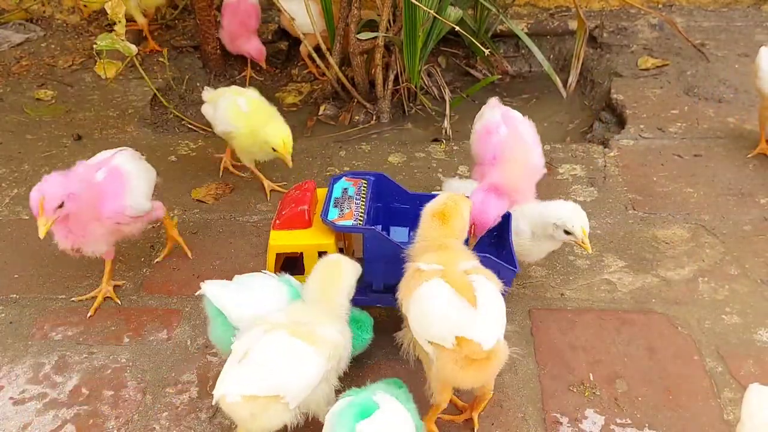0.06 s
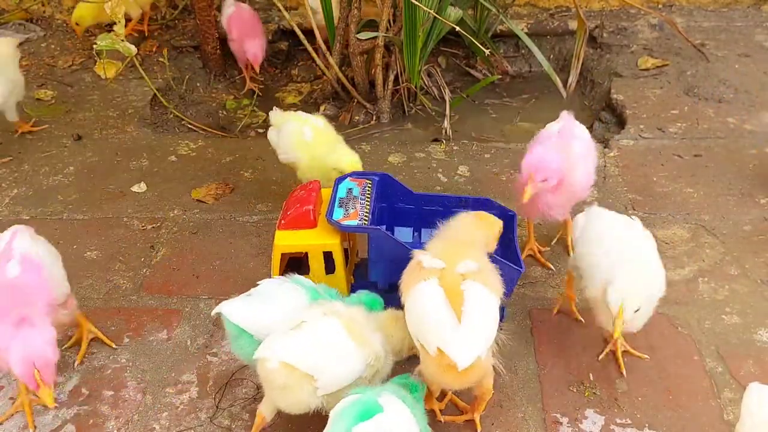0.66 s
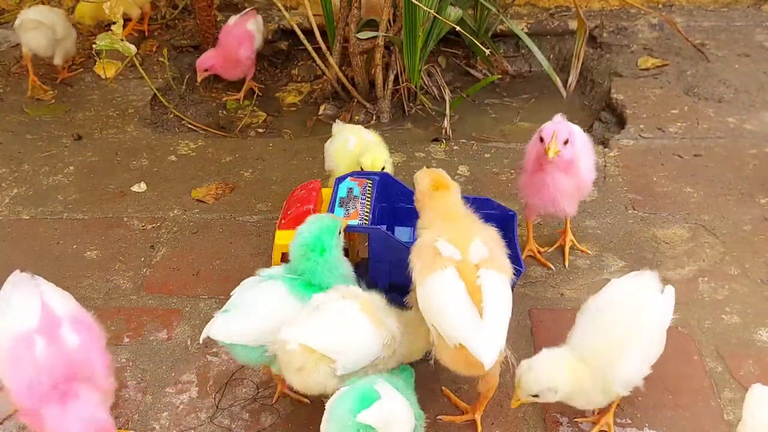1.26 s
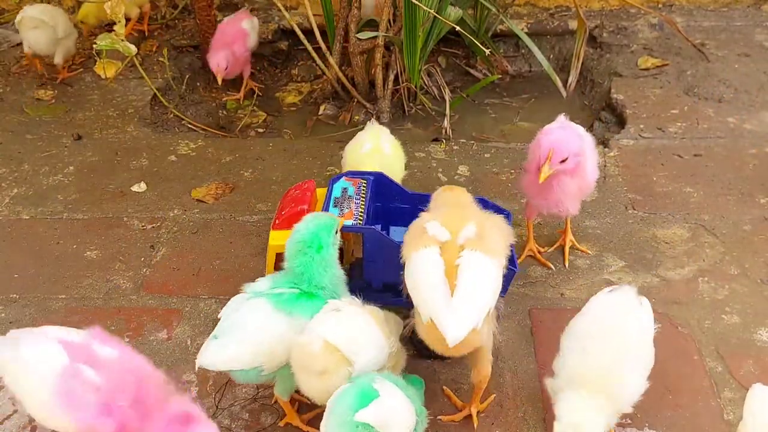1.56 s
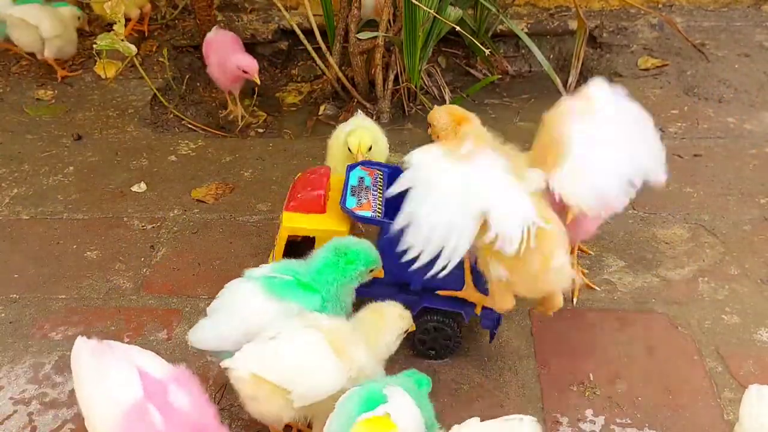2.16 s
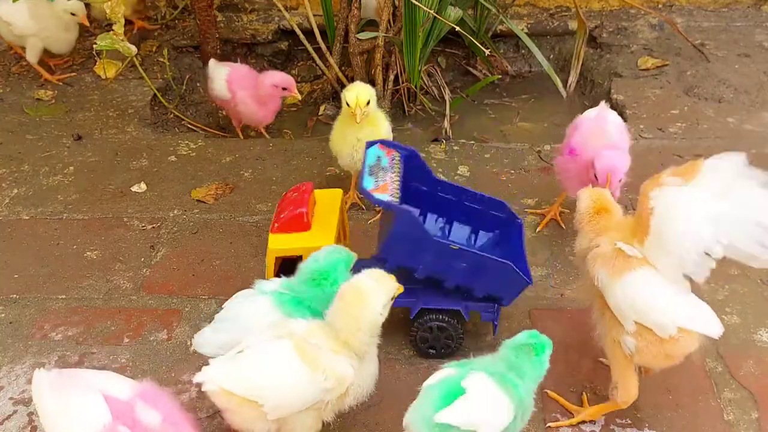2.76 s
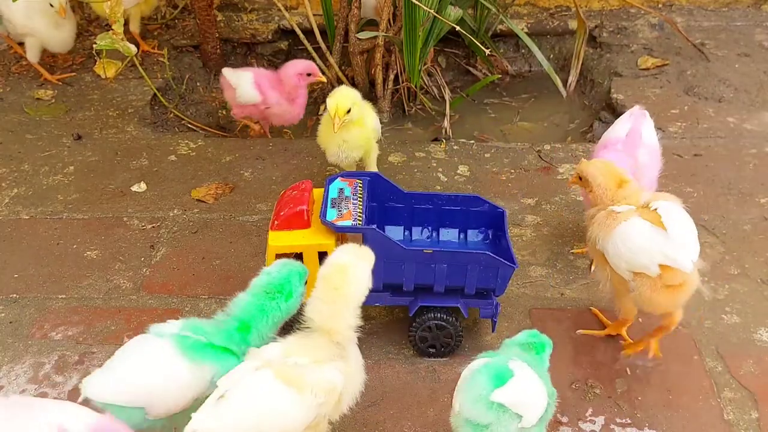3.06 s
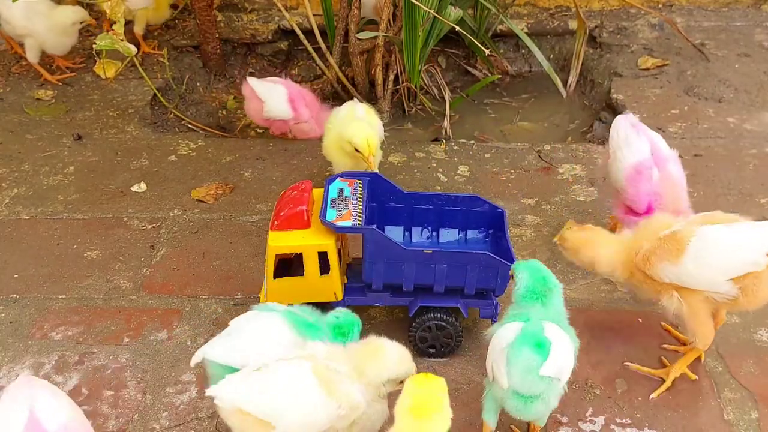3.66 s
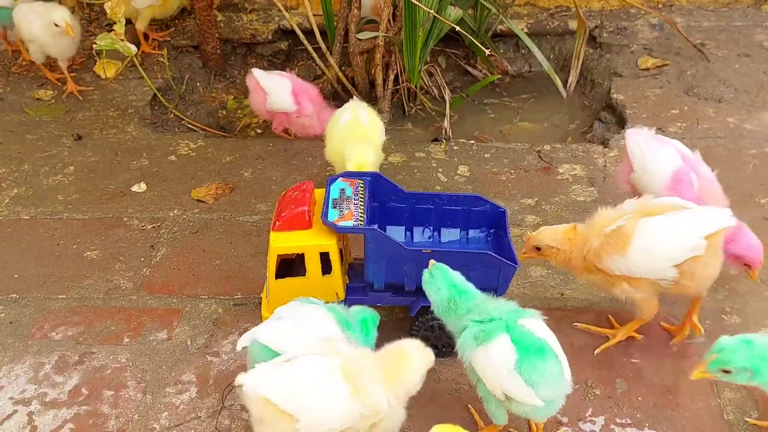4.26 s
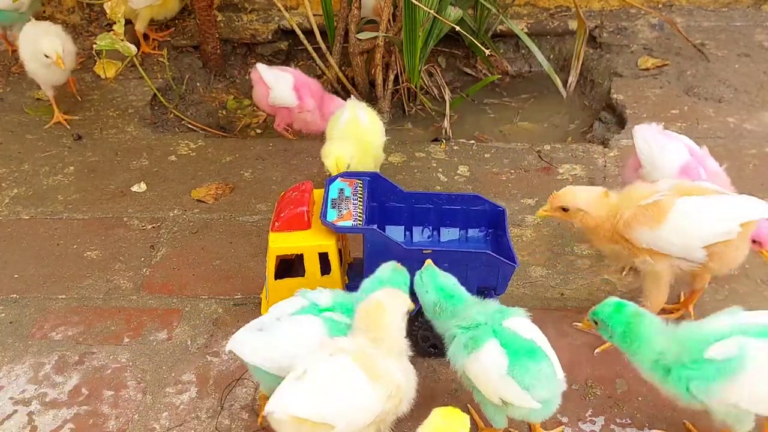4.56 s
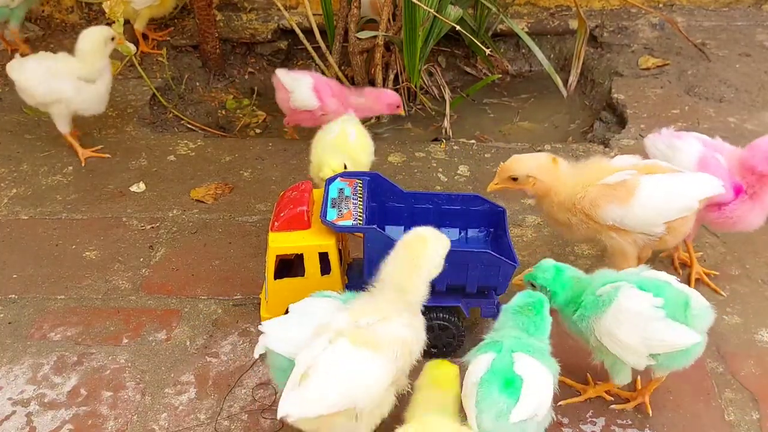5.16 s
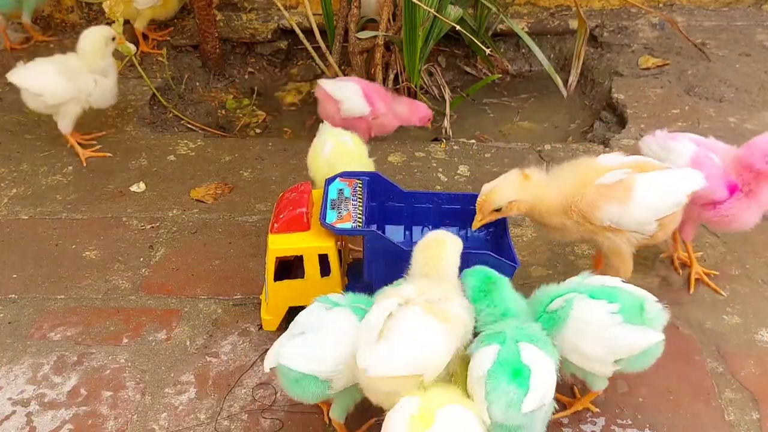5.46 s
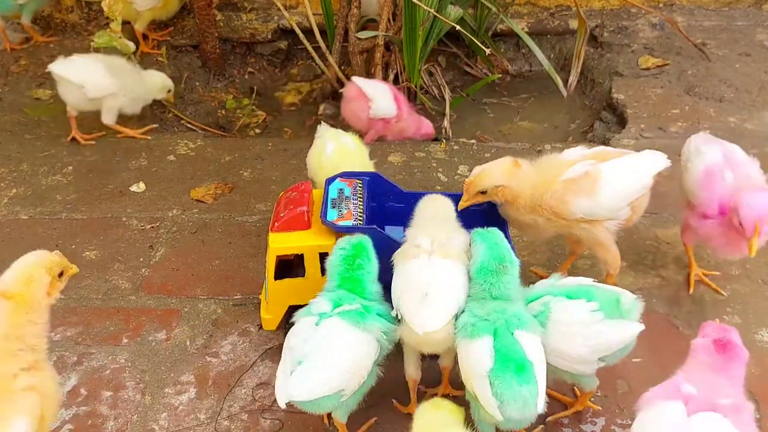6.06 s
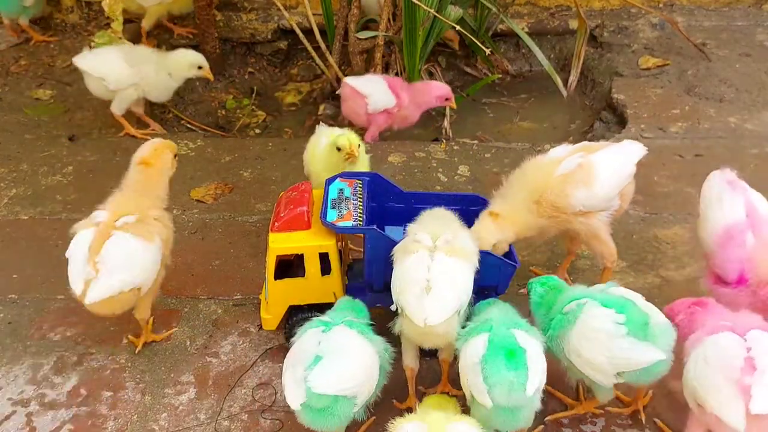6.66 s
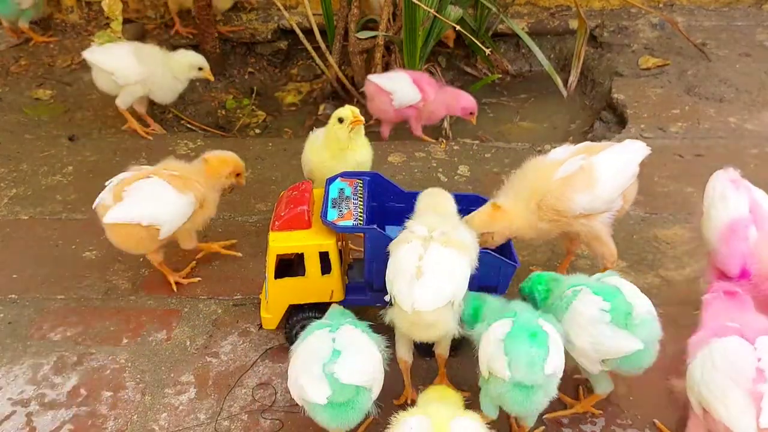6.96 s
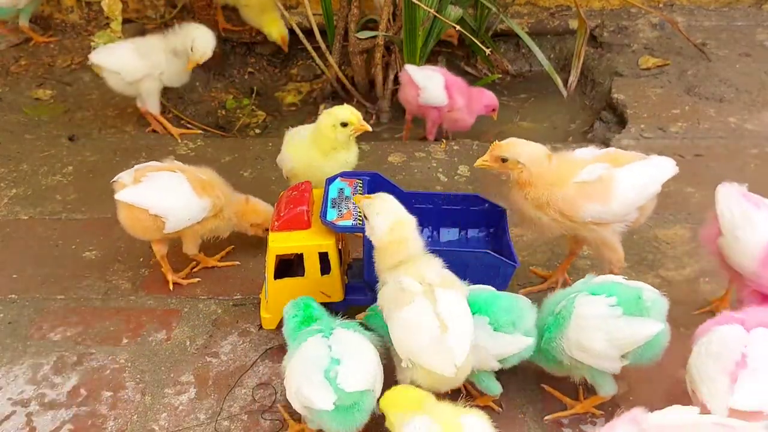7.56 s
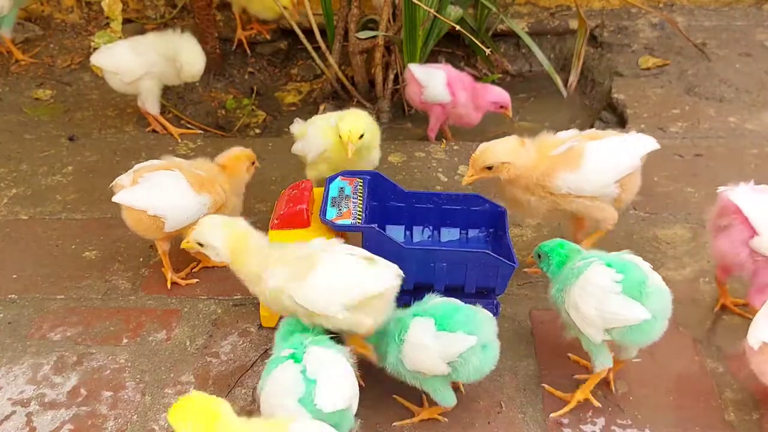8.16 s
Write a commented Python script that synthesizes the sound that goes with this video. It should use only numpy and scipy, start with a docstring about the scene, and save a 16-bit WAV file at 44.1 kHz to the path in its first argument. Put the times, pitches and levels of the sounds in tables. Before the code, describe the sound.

A flock of young chicks peeps close by in a brick yard, over a low rumble of moving air and a faint hum. Their beaks tap a hollow plastic toy truck. One chick trills and flaps in soft puffs of air, the toy's wheels scrape briefly, and a second trill comes with loud knocks. The hum swells and sinks while peeps and lighter pecks continue.

```python
"""From the start, chicks peep in a brick yard over moving air and a low hum; low walls give a short echo.
Soon their beaks peck a hollow plastic toy truck. Near 1.8 s one chick trills and flaps onto the toy,
pushing out puffs of air. The wheels grate as it tips at 2.4 s, and a second trill comes with loud knocks.
The hum swells around 5 s and sinks back, while peeps and lighter pecks go on to the end."""
import sys
import numpy as np
from scipy import signal
from scipy.fft import rfft, irfft, next_fast_len
from scipy.io import wavfile

SR = 44100
rng = np.random.default_rng(int(sys.argv[2]) if len(sys.argv) > 2 else 0)


def file_out(sig):
    """Save sig as 16-bit WAV at sys.argv[1]."""
    # one column per channel
    cols = np.atleast_2d(sig).T
    # limit, then scale
    lim = np.clip(cols, -1, 1)
    pcm = np.round(lim * 32767).astype(np.int16)
    wavfile.write(sys.argv[1], SR, pcm)


N = 370881
TIME = np.arange(N) / SR
JITTER = .009  # a voice shakes by this share of its pitch

# Peeps that slide down. Each row: start in seconds, length in seconds, middle pitch in Hz,
# level in dB, head start on the left in ms.
PEEPS = [(0.005, 0.031, 3060, -51, 0.1), (0.063, 0.038, 3660, -46, 0.074),
         (0.294, 0.036, 3300, -46, -0.092), (0.507, 0.071, 3640, -43.5, 0.2),
         (0.647, 0.045, 3500, -49, 0.01), (0.671, 0.06, 4130, -46.5, 0.17),
         (0.754, 0.027, 3320, -41, -0.071), (0.787, 0.055, 3660, -44.5, -0.042),
         (0.877, 0.07, 3110, -43, -0.23), (0.937, 0.045, 4100, -42.5, 0.037),
         (1.025, 0.044, 3640, -42.5, -0.069), (1.925, 0.035, 4000, -41, 0.014),
         (2.062, 0.041, 4190, -36.5, -0.0041), (2.18, 0.032, 3310, -44, -0.24),
         (2.318, 0.034, 3500, -49.5, 0.072), (2.508, 0.036, 3406, -38, -0.0029),
         (2.687, 0.049, 3200, -46, 0.039), (2.758, 0.045, 3130, -39.5, 0.065),
         (3.2, 0.024, 3290, -54, 0.24), (3.327, 0.031, 3690, -47, -0.018),
         (3.318, 0.05, 3180, -38.5, 0.091), (3.486, 0.051, 3555, -42.5, -0.35),
         (3.592, 0.028, 3300, -44.5, -0.043), (3.671, 0.03, 3090, -48.5, -0.049),
         (3.765, .026, 3030, -52, 0.043), (3.798, 0.033, 3470, -43.5, -0.053),
         (4.016, 0.055, 3590, -43, -0.085), (4.157, 0.049, 3940, -43, -0.01),
         (4.214, 0.031, 3110, -46, 0.053), (4.336, 0.02, 3285, -36, 0.023),
         (4.462, 0.049, 3690, -40, 0.011), (5.053, 0.06, 3430, -49.5, -0.049),
         (5.314, 0.057, 2760, -39.5, 0.19), (5.706, 0.03, 3190, -50.5, 0.054),
         (6.134, 0.063, 3600, -44.5, 0.15), (6.319, 0.038, 3330, -54, 0.03),
         (6.352, 0.037, 3960, -49, -0.084), (6.431, 0.027, 2900, -38.5, 0.17),
         (6.467, 0.056, 3190, -46, -0.0047), (6.689, 0.053, 3870, -48, 0.067),
         (6.796, 0.036, 2890, -44.5, 0.12), (7.061, 0.047, 2980, -40, 0.16),
         (7.295, 0.057, 3050, -54.5, 0.11), (7.917, 0.037, 3010, -44.5, -0.085),
         (8.103, 0.047, 3750, -43, -0.06), (8.186, 0.04, 3010, -46.5, 0.094),
         (8.276, 0.041, 3570, -45.5, -0.049), (8.37, 0.036, 2950, -50, 0.075)]
# How the toy's hollow shell and its panels ring. Each row: pitch in Hz, width in Hz, boost in dB.
SHELL = [(405, 140, 1.5), (700, 245, 1.5), (1152, 260, 3), (1608, 250, -1.5)]
PANELS = [(3020, 160, 12), (3670, 870, 8), (5040, 600, 2.5), (7080, 250, -7), (12000, 6800, -7)]


def amp(db):
    return 10 ** (np.asarray(db) / 20)


def unit(x):
    """Scales a signal to an average (rms) strength of one."""
    return x / np.sqrt(np.mean(x ** 2) + 1e-20)


def read(points, hz):
    """Looks up a value between a table's frequencies, on a logarithmic scale."""
    f, value = np.transpose(points)
    return np.interp(np.log(hz + 1), np.log(f + 1), value)


def add(mix, s, sound):
    """Mixes a stereo sound in at s seconds."""
    part = mix[:, max(round(s * SR), 0):][:, :sound.shape[1]]
    part += sound[:, :part.shape[1]]


def wander(size, hz):
    """A random wobble that changes up to about hz times a second."""
    padded = size + SR // 4
    f = np.fft.rfftfreq(padded, 1 / SR)
    return unit(irfft(rfft(rng.standard_normal(padded)) / (1 + (f / hz) ** 4)))[:size]


def noise(colour, alike):
    """Stereo noise shaped by a colour table; alike=1 makes both sides the same."""
    a, b = rng.standard_normal((2, N))
    pair = np.array([a, alike * a + np.sqrt(1 - alike ** 2) * b])
    size = next_fast_len(N)
    gain = amp(read(colour, np.fft.rfftfreq(size, 1 / SR)))
    return unit(irfft(rfft(pair, size) * gain, size)[:, :N])


def ring(x, modes):
    """Lets a sound ring at each of an object's own pitches."""
    return sum(amp(db) * signal.lfilter(*signal.iirpeak(hz, hz / width, SR), x)
               for hz, width, db in modes)


def place(x, pan_db, lead_ms):
    """Positive values make the left side louder and earlier; the top treble gets no head start."""
    size = next_fast_len(len(x) + 64)
    hz = np.fft.rfftfreq(size, 1 / SR)
    turn = np.exp(1j * np.pi * hz * lead_ms / 1000 / (1 + (hz / 5800) ** 12))
    sides = np.array([amp(pan_db / 2) * turn, amp(-pan_db / 2) / turn])
    return irfft(rfft(x, size) * sides, size)


def air(level_db):
    """Air makes a faint, steady hiss."""
    # Colour of the hiss. Each row: frequency in Hz, relative level in dB.
    colour = [(700, -2), (2200, -9.5), (16000, -14.5)]
    return amp(level_db) * noise(colour, alike=.48)


def hum(hz, waver, left_db):
    """A wavering low hum swells and sinks back once."""
    # The swell: peak time in seconds, half width in seconds, peak level in dB, resting level in dB.
    swell = (5, 1.04, -44.5, -53)
    peak_s, width_s, peak_db, rest_db = swell
    level_db = rest_db + (peak_db - rest_db) * np.exp(-((TIME - peak_s) / width_s) ** 2)
    pitch = hz * (1 + waver * wander(N, 8.7))
    tone = np.sin(2 * np.pi * np.cumsum(pitch) / SR)
    return amp(level_db) * unit(tone) * amp([[left_db / 2], [-left_db / 2]])


def rumble(gain_db, lumps_db, left_db):
    """Moving air makes a lumpy low noise, stronger on the left."""
    # Strength of the rumble. Each row: time in seconds, level in dB before gain_db.
    strength = [(0, -42.5), (1.7, -39), (2.25, -43), (2.6, -37.5), (3.65, -41.5), (5.25, -40.5), (7.2, -47),
                (8.4, -44.5)]
    # Its colour. Each row: frequency in Hz, relative level in dB.
    colour = [(20, -24), (55, 3), (140, 1.5), (175, -9), (260, -11), (420, -24.5), (2500, -59.5)]
    flow = noise(colour, alike=.49) * unit(amp(lumps_db * wander(N, 7.2)))
    level_db = np.interp(TIME, *np.transpose(strength)) + gain_db
    return amp(level_db) * flow * amp([[left_db / 2], [-left_db / 2]])


def yard_echo(x, early_db, tail_db):
    """Sound bounces quickly off ground, toy and birds, then the walls add a thin tail."""
    # How long the yard echoes. Each row: frequency in Hz, seconds to fade by 60 dB.
    fade_times = [(1500, 0.39), (3000, 0.31), (15000, 0.12)]
    size = SR // 2
    echoes = rng.standard_normal((2, size)) * (rng.random((2, size)) < 3000 / SR)
    hz, t, bands = signal.stft(echoes, SR, nperseg=256)
    bands *= amp(-60 * t / read(fade_times, hz)[:, None]) * (1 - np.exp(-t / .0092))
    tail = signal.istft(bands, SR, nperseg=256)[1]
    response = amp(tail_db) * tail / np.linalg.norm(tail[0])
    for side in response:
        delays = rng.integers(SR // 1500, SR // 35, size=14)
        side[delays] += amp(early_db) * rng.choice([-1, 1], size=14)
    return signal.fftconvolve(x, response, axes=1)[:, :N]


def rustle(hiss_db, grain_db, ticks_db, per_s, spread_db, calm_db=-75):
    """Feathers brush and small feet tick, both louder when the flock jostles."""
    # Bursts of jostling. Each row: peak in seconds, seconds to build or fade, relative level in dB.
    flurries = [(1.9, 0.14, -46.5), (2.55, 0.15, -54), (2.86, 0.049, -41), (4.561, 0.14, -54),
                (6.62, 0.074, -56), (7.63, 0.027, -61.5), (8.1, 0.26, -72)]
    stir = amp(calm_db) + sum(amp(db) * np.exp(-abs(TIME - s) / width) for s, width, db in flurries)
    steps = (rng.random(N) < per_s / SR) * amp(spread_db * np.minimum(rng.exponential(1, N), 3))
    ticks = signal.lfilter([1], [1, -np.exp(-1 / (.0021 * SR))], steps)
    feet = unit(ticks) * noise([(300, 3.5), (1500, -8.5), (16000, -24.5)], alike=.25)
    grains = unit(amp(grain_db * wander(N, 70)))
    feathers = grains * noise([(1000, 2), (4000, -7), (12000, -4), (16000, -8.5)], alike=1)
    return amp(hiss_db) * stir * feathers + amp(ticks_db) * np.sqrt(stir) * feet


def wing_puffs(gain_db, push_s, flutter_db, right_db):
    """Each puff is one swing of air pressure inside a short flutter, mostly on the left."""
    # Wing beats and puffs of air. Each row: time in seconds, level in dB before gain_db.
    puffs = [(1.302, -30), (1.655, -14.5), (1.778, -16.5), (1.989, -11.5), (3.081, -27), (3.145, -23.5),
             (3.218, -23), (3.285, -28), (3.502, -22)]
    out, t = np.zeros((2, N)), np.arange(-SR // 20, SR // 20) / SR
    push = -np.exp(-(t / push_s) ** 2) * (1 - 2 * (t / push_s) ** 2)
    for s, db in puffs:
        flutter = np.array([wander(len(t), 256) for side in range(2)]) * np.exp(-abs(t) / .013)
        add(out, s + t[0], amp(db + gain_db) * (push + amp(flutter_db) * flutter) * amp([[0], [right_db]]))
    return signal.sosfilt(signal.butter(2, 45, "high", fs=SR, output="sos"), out)


def wheel_scrape(start_s, rise_s, level_db, grain_db):
    """The toy's wheels grate on brick in an uneven stutter as it tips."""
    # Colour of the grating. Each row: frequency in Hz, relative level in dB.
    grit = [(150, -0.5), (380, 5), (6000, -23.5)]
    age = np.maximum(TIME - start_s, 0) / rise_s
    swell = amp(level_db) * age * np.exp(1 - age)
    return swell * noise(grit, alike=.66) * unit(amp(grain_db * wander(N, 140)))


def scratches(grain_db, panel_db):
    """Claws and beaks drag over the toy, ringing the same shell and panels as a peck."""
    # The drags. Each row: start in seconds, seconds to the peak, level in dB.
    drags = [(0.595, 0.0075, -52), (4.07, .012, -50), (4.919, 0.013, -40.5), (5.783, 0.009, -51.5),
             (5.972, 0.013, -55.5)]
    out, t = np.zeros((2, N)), np.arange(SR // 5) / SR
    for s, rise_s, db in drags:
        grains = rng.standard_normal(len(t)) * amp(grain_db * wander(len(t), 250))
        shell = unit(ring(ring(grains, SHELL), SHELL))
        body = unit(shell + amp(panel_db) * unit(ring(grains, PANELS)))
        swell = amp(db) * t / rise_s * np.exp(1 - t / rise_s)
        add(out, s, place(swell * body, pan_db=3, lead_ms=0))
    return out


def taps(knock_db, ring_s, shell_db, click_db, contact_s, rattle_db, rattle_s, scatter_db):
    """The toy's struck wall gives a short hollow note; the hit and a rattle ring its shell and panels."""
    # Pecks, claws and knocks. Each row: start in seconds, note in Hz, then the relative levels
    # of the hollow knock and the sharp click in dB.
    hits = [(0.645, 1740, -45.5, -52.5), (1.198, 1370, -40, -59), (1.215, 1400, -42, -62),
            (1.269, 1600, -51.5, -48), (1.329, 1610, -50, -35.5), (1.9259, 1560, -26, -26.5),
            (2.4003, 1370, -36, -50.5), (2.782, 1770, -35, -35), (2.787, 1760, -20, -30.5),
            (2.882, 1300, -20.5, -24), (2.936, 1470, -30.5, -46.5), (4.238, 660, -34, -44),
            (4.273, 1125, -34.5, -50), (4.4, 1370, -40.5, -55), (4.43, 1000, -36, -49.5),
            (4.544, 673, -30.5, -38), (4.562, 1410, -39, -50), (4.572, 1390, -38, -47),
            (4.585, 1440, -28.5, -41), (4.708, 700, -36.5, -43), (4.752, 1115, -36, -46.5),
            (4.921, 1010, -33.5, -52), (5.099, 1390, -38.5, -55), (5.129, 1210, -33.5, -53),
            (6.575, 1340, -46.5, -61), (6.726, 1340, -43.5, -64), (6.903, 1320, -40.5, -64),
            (7.171, 1150, -44, -56.5), (7.943, 774, -37, -52.5), (8.132, 780, -39.5, -53)]
    out, t = np.zeros((2, N)), np.arange(SR // 8) / SR
    blow = np.exp(-t / contact_s) + amp(rattle_db) * np.exp(-t / rattle_s)
    note_shape = np.sqrt(t / ring_s) * np.exp(-t / ring_s)
    for s, knock_hz, hollow_db, sharp_db in hits:
        force = blow * rng.standard_normal(len(t))
        sound = amp(hollow_db + knock_db) * np.sin(2 * np.pi * knock_hz * t) * note_shape
        thin_db = .52 * max(sharp_db - hollow_db + 10.5, 0)  # with the shell still, a tick is all treble
        parts = (SHELL, hollow_db + shell_db, 0), (PANELS, sharp_db + click_db - thin_db, thin_db)
        for modes, db, tilt_db in parts:
            spot = [(hz * (1 + .042 * rng.standard_normal()), width,
                     level + scatter_db * rng.standard_normal() + tilt_db * np.log2(hz / 1000))
                    for hz, width, level in modes]  # each hit rings a little differently
            wider = [(hz, 3 * width, 0) for hz, width, _ in spot]
            struck = ring(ring(force, spot), wider)  # a second pass trims the noise around each pitch
            sound += amp(db) * struck / np.std(struck[:SR // 100])
        add(out, s, np.array([sound, sound]))
    return out


def whistle(hz, overtone_db, jitter, shimmer_db=3, third_db=-7):
    """A chick's voice box makes a nearly pure, slightly shaky tone, which its throat colours."""
    # The throat's colour. Each row: frequency in Hz, boost in dB.
    throat = [(3900, 2), (4800, -4), (6300, -9), (7500, -2.5), (8400, -13.5), (9200, -23), (12000, -32)]
    hz = hz * (1 + jitter * wander(len(hz), 360))
    phase = 2 * np.pi * np.cumsum(hz) / SR
    tone = sum(amp(read(throat, k * hz) + db) * np.sin(k * phase)
               for k, db in ((1, 0), (2, overtone_db), (3, overtone_db + third_db)))
    return unit(tone * amp(shimmer_db * wander(len(hz), 63)))


def slide(progress, length, hz, usual_s=.042, fall_octaves=.35, straight_hz=3180, arch=.55):
    """The pitch falls, further in a longer peep; above straight_hz its path arches."""
    fall = fall_octaves * np.sqrt(length / usual_s) * (progress - .5)
    bow = arch * np.log2(hz / straight_hz) * (2 * progress - 1) ** 2
    return hz * 2 ** (-fall - bow)


def scoop(progress, length, hz, flick, settle=.1):
    """The pitch settles, then shoots up as the peep ends."""
    return hz * (1 + settle * (1 - progress) ** 3 + flick * progress ** 6)


def peeps(rows, contour, gain_db, end_db, jitter, spill=0, overtone_db=-17.5):
    """Each peep swells, bends in pitch and fades; its ends spill over by a share of its length."""
    out = np.zeros((2, N))
    chance = rng.standard_normal((len(rows), 3))
    for (s, length, *pitch, db, lead_ms), (hoarse, bright, side) in zip(rows, chance):
        progress = np.arange(-spill, 1 + spill, 1 / (length * SR))
        swell = signal.windows.tukey(len(progress), .25 + 2 * spill) * amp(end_db * progress ** 4)
        hz = contour(progress, length, *pitch)
        voice = whistle(hz, overtone_db + 3.5 * bright, jitter * amp(4 * hoarse))
        call = amp(db + gain_db) * unit(swell * voice)
        add(out, s - spill * length, place(call, pan_db=-2 + 1.5 * side, lead_ms=lead_ms))
    return out


def far_peeps(count, level_db, spread_db, low_hz, range_hz, length_s, within_s, lead_ms):
    """Chicks by the wall call softly and hoarsely, each around the time of a nearer peep."""
    rows = []
    for which, when, pitch, size, side in rng.random((count, 5)):
        near_s = PEEPS[int(which * len(PEEPS))][0]
        start_s = max(near_s + within_s * (2 * when - 1), 0)
        hz = low_hz + range_hz * pitch ** 2
        rows.append((start_s, length_s, hz, level_db + spread_db * size, lead_ms * (2 * side - 1)))
    return peeps(rows, slide, gain_db=0, end_db=-3, jitter=.025, spill=.2)


def near_peeps():
    """Chicks close by whistle two kinds of peep: one slides down, the other flicks up."""
    # Peeps that flick up. Each row: start in seconds, length in seconds, base pitch in Hz, flick as
    # a share of that pitch, level in dB before gain_db, head start on the left in ms.
    scoops = [(0.23, 0.053, 2450, 0.54, -52.5, -0.046), (0.464, 0.045, 2460, 0.18, -44.5, 0.054),
              (0.707, 0.038, 2660, 0.17, -46.5, 0.069), (0.822, 0.054, 2434, 0.34, -47, 0.06),
              (0.896, 0.048, 2633, 0.41, -41, -0.27), (1.184, 0.045, 2776, 0.32, -43.5, 0.091),
              (1.359, 0.049, 2524, 0.73, -40.5, 0.025), (1.413, 0.053, 2486, 0.5, -45, -0.0024),
              (1.684, 0.064, 2565, 0.69, -45.5, 0.11), (2.028, 0.03, 2540, 0.56, -43, 0.039),
              (2.145, 0.062, 2694, .55, -41.5, 0.06), (2.194, 0.018, 5380, 0.33, -44.5, -0.019),
              (8.261, .06, 2540, 0.48, -54, 0), (3.372, 0.079, 2553, 1, -47, 0.044),
              (3.711, 0.041, 3120, .12, -45.5, -0.033), (3.979, 0.059, 2777, 0.075, -41.5, -0.14),
              (4.158, 0.045, 2470, 0.22, -46, 0.049), (4.726, 0.055, 3076, 0.23, -51, 0.0063),
              (4.966, 0.058, 3540, 0.37, -44, 0.004), (5.322, 0.061, 2470, 0.23, -39.5, -0.14),
              (5.545, 0.051, 2512, 0.78, -47, 0.054), (5.635, 0.059, 2415, 0.37, -53.5, -0.11),
              (6.175, 0.041, 2795, .15, -41.5, 0.073), (6.688, 0.063, 2440, 0.77, -49.5, -0.093),
              (7.09, 0.026, 2750, 0.49, -45, 0.21), (7.45, 0.046, 2830, 0.48, -44.5, -0.18),
              (7.51, 0.064, 2523, 0.84, -47, 0.037), (7.669, 0.059, 2455, 0.5, -51.5, -0.13)]
    falling = peeps(PEEPS, slide, gain_db=0, end_db=-1, jitter=JITTER, spill=.12)
    return falling + peeps(scoops, scoop, gain_db=2.5, end_db=.5, jitter=JITTER)


def trill(first_dip_s, period_s, count, low_hz, high_hz, gain_db, end_db, rasp_db,
          dip_db=2, start_db=-16, sag=.08):
    """A startled chick's pitch swings by about an octave, rings out in each dip and slowly sinks."""
    cycle = np.arange(-1.4, count - .55, 1 / (period_s * SR))
    progress = np.linspace(0, 1, len(cycle))
    dip = np.cos(np.pi * cycle) ** 2 * np.clip(1 + cycle / 2, 0, 1)  # the swing builds up
    top = high_hz * (1 - .2 * (2 * progress - 1) ** 4)
    hz = (top + (low_hz - top) * dip) * (1 - sag * (progress - .5))
    voice = whistle(hz, overtone_db=rasp_db, jitter=2 * JITTER)
    shape_db = start_db * np.maximum(-cycle, 0) + end_db * progress ** 4 + dip_db * (dip - 2.5)
    swell = signal.windows.tukey(len(cycle), .1) * amp(gain_db + shape_db)
    out = np.zeros((2, N))
    add(out, first_dip_s + cycle[0] * period_s, place(swell * voice, pan_db=0, lead_ms=.081))
    return out


def scene():
    """Mixes the chicks, the toy and their echoes over the low background."""
    flock = near_peeps()
    flock += far_peeps(count=45, level_db=-61, spread_db=6, low_hz=2850, range_hz=1100,
                       length_s=.036, within_s=.05, lead_ms=.2)
    alarm = trill(first_dip_s=1.7945, period_s=.0269, count=5, low_hz=2824, high_hz=5510,
                  gain_db=-16, end_db=-9.5, rasp_db=-9)
    alarm += trill(first_dip_s=2.8163, period_s=.0281, count=4, low_hz=2770, high_hz=5440,
                   gain_db=-17.5, end_db=-7.5, rasp_db=-7)
    bustle = taps(knock_db=8.5, ring_s=.0022, shell_db=-6, click_db=6, contact_s=.00183,
                  rattle_db=-14.5, rattle_s=.014, scatter_db=3)
    bustle += wheel_scrape(start_s=2.402, rise_s=.037, level_db=-40, grain_db=4.5)
    bustle += scratches(grain_db=1, panel_db=-7)
    bustle += rustle(hiss_db=-5.5, grain_db=6, ticks_db=-33, per_s=20, spread_db=2)
    echo = yard_echo(flock, early_db=-20.5, tail_db=-13.5)
    echo += yard_echo(alarm, early_db=-19.5, tail_db=-16)
    echo += yard_echo(bustle, early_db=-19.5, tail_db=-13)
    low = rumble(gain_db=1.5, lumps_db=2.5, left_db=4) + hum(hz=122.1, waver=.05095, left_db=-.5)
    low += wing_puffs(gain_db=7, push_s=.0033, flutter_db=-9, right_db=-27)
    return flock + alarm + bustle + echo + low + air(level_db=-66.5)


def record(dry):
    """Cuts away the very highest treble."""
    edge_hz = 16100
    low_pass = signal.firwin(401, edge_hz, window=("kaiser", 9), fs=SR)
    return signal.oaconvolve(dry, low_pass[None], "same")


dry = scene()
out = record(dry)
file_out(out)
```